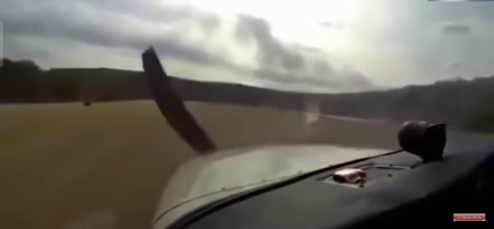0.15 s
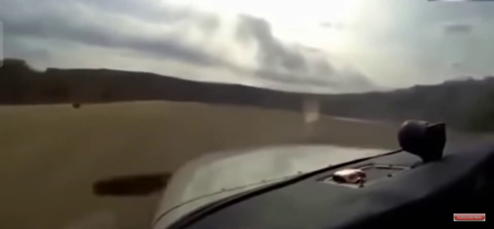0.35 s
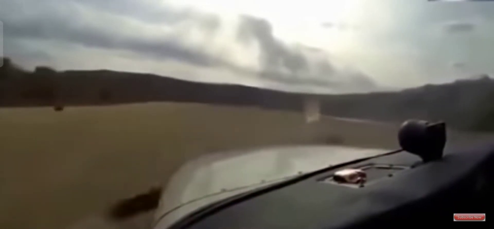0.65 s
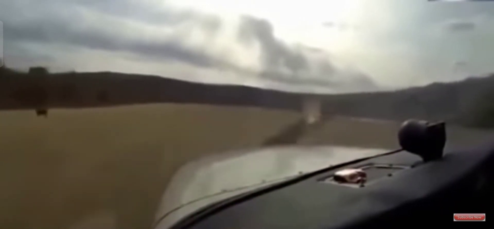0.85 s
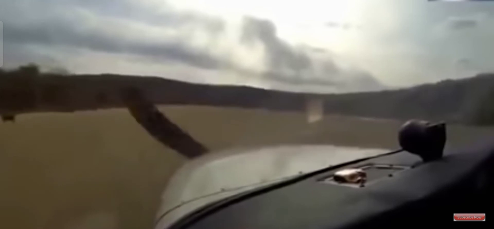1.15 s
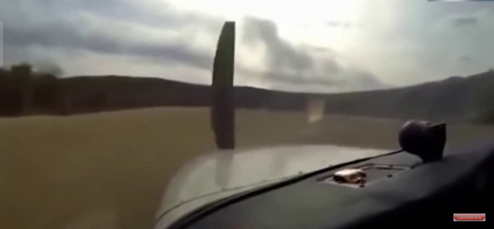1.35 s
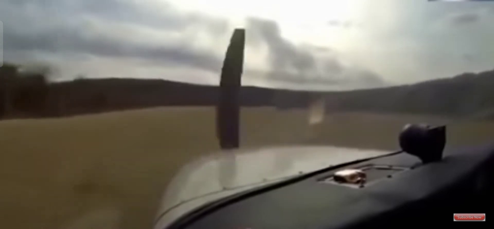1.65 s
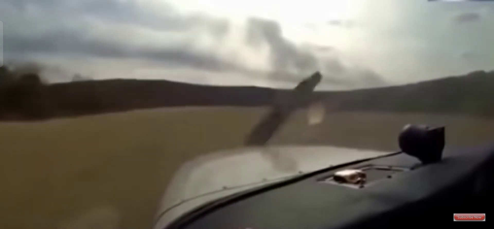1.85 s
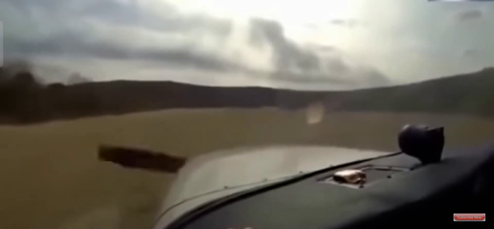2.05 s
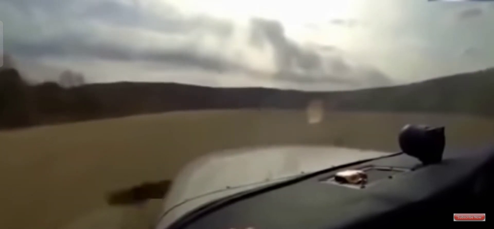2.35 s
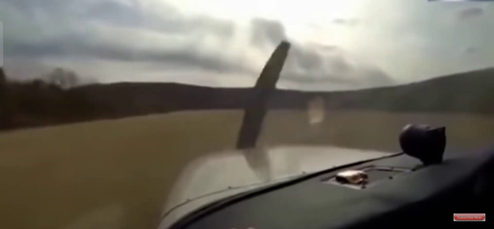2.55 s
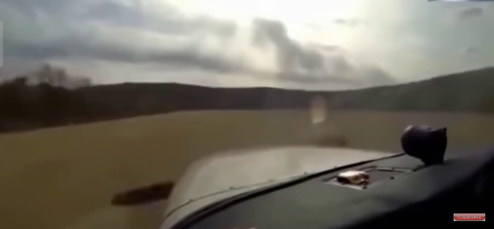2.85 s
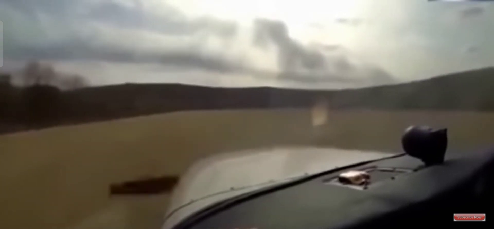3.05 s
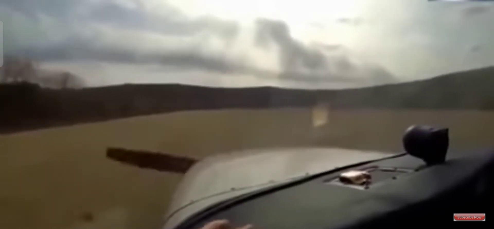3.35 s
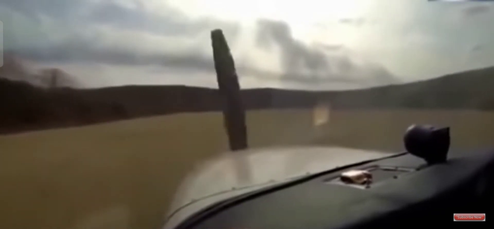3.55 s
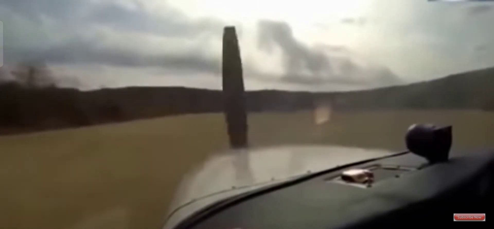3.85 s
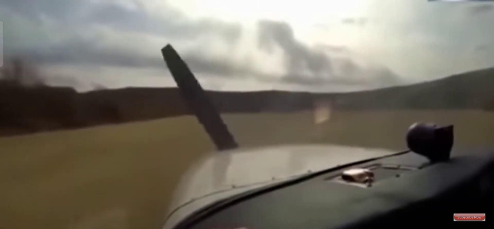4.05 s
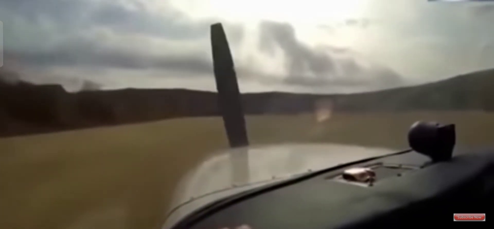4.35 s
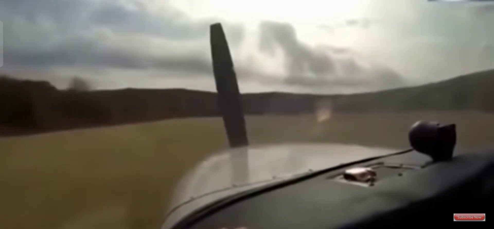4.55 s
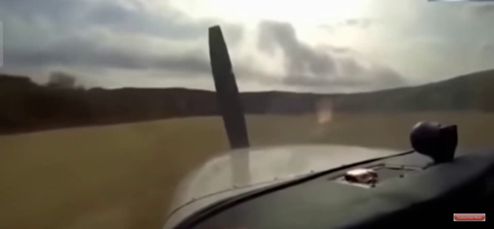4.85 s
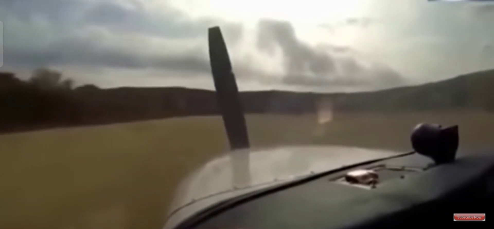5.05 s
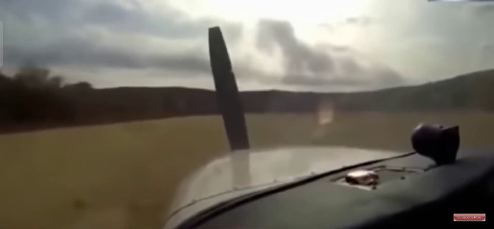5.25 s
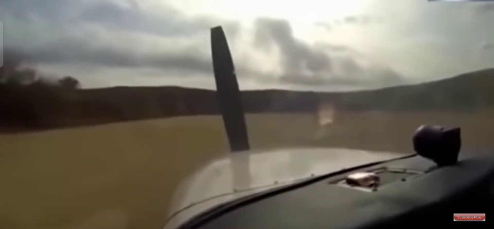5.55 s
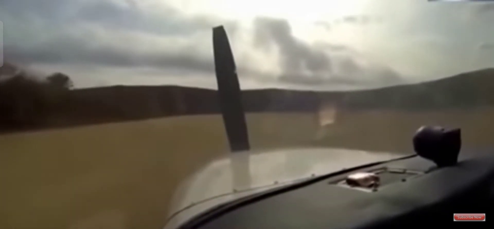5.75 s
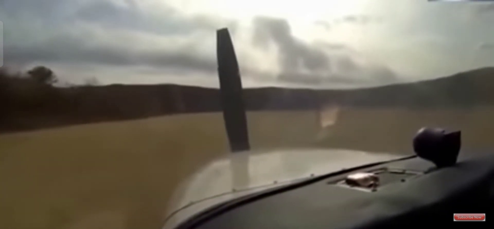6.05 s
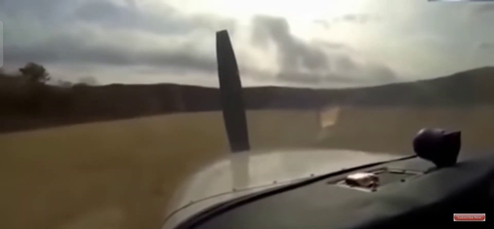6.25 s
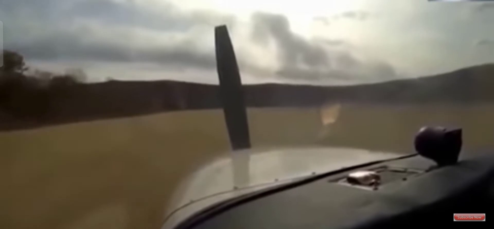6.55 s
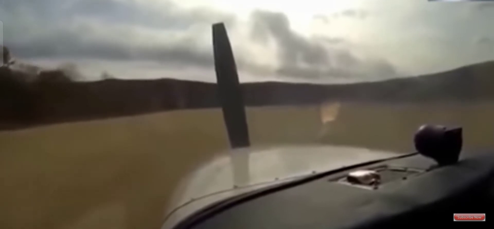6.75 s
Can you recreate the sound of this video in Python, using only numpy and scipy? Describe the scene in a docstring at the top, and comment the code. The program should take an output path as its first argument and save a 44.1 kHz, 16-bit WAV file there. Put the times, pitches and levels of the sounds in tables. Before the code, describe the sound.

Heard from the seat of a small plane gliding down: a heavy low buffeting boom throbs unevenly with a wavering hum, over a much quieter airy hiss. Loose panels tick and chatter, joints creak faintly, dull jolts thump the airframe. Near six seconds the wheels hit with a deep thud and short turf crunch; the hiss drops and bumps clatter. Close, mono, limited and dull on top.

```python
"""In the cabin of a small plane gliding onto a grass field, heard from the seat: close, mono, limited.
Noise rung through low resonances makes the buffeting boom, over a wavering sine hum; noise shaped by the
canopy's hollows makes the slipstream hiss. Short decaying tones tick, creak and thump in panel and airframe.
Near six seconds the wheels hit: the hiss falls away, turf crunches, and bumps thump and clatter."""
import sys
import numpy as np
from scipy.fft import rfft, irfft, next_fast_len
from scipy.io import wavfile
from scipy.ndimage import uniform_filter1d, minimum_filter1d, map_coordinates

SR = 44100
rng = np.random.default_rng(int(sys.argv[2]) if len(sys.argv) > 2 else 0)


def put_to_file(sound):
    """Save the sound as 16-bit audio at rate SR, in the file named by the first command-line argument."""
    columns = np.atleast_2d(sound).T  # one column per channel
    safe = np.clip(columns, -1, 1)
    whole_steps = np.round(safe * 32767)
    wavfile.write(sys.argv[1], SR, whole_steps.astype(np.int16))


N = 304290  # length in samples, about 6.9 s
TIME_S = np.arange(N) / SR
TOP_HZ = 8300  # nothing is kept above this
TOUCHDOWN_S = 5.912  # the wheels meet the grass
SETTLE_S, DULLING_S = 0.011, 0.05  # the shaking builds up, and the treble dies away, over these times


def amp(db):
    """Decibels to gain."""
    return 10 ** (np.asarray(db) / 20)


def unit(x):
    """Scale to rms 1."""
    return x / np.sqrt(np.mean(x ** 2) + 1e-20)


def along(points, hz):
    """Read (pitch_hz, value) points on a log frequency axis."""
    point_hz, values = np.transpose(points)
    return np.interp(np.log(hz + 1), np.log(point_hz + 1), values)


def curve(rows):
    """Draw straight lines through (time_s, value) rows, one value per sample."""
    times, values = np.transpose(rows)
    return np.interp(TIME_S, times, values)


def swings(level_db):
    """A level curve's departures from its own mean."""
    return level_db - level_db.mean()


def wobble(rate):
    """A smooth random curve, rate knots a second."""
    knots = rng.standard_normal(int(N * rate / SR) + 4)
    return map_coordinates(knots, [np.arange(N) * rate / SR])


def filtered(x, response):
    """Multiply the spectrum of x by a response of frequency."""
    size = next_fast_len(len(x) + SR // 2)
    spectrum = rfft(x, size) * response(np.fft.rfftfreq(size, 1 / SR))
    return irfft(spectrum, size)[:len(x)]


def shaped_noise(points, envelope):
    """White noise under an envelope, then coloured by (pitch_hz, relative_db) points."""
    noise = rng.standard_normal(len(envelope)) * envelope
    return filtered(noise, lambda f: amp(along(points, f)))


def body(modes, f):
    """Causal response of (pitch_hz, width_hz, level_db) resonances, with alternating signs."""
    total = 0
    for k, (hz, width, db) in enumerate(modes):
        damping = 1j * f * width
        total = total + (-1) ** k * amp(db) * damping / (hz * hz - f * f + damping)
    return total


def hollows(modes, f):
    """Gain of steep-sided (pitch_hz, width_hz, level_db) resonances whose powers add."""
    return np.sqrt(sum(amp(db) ** 2 / (1 + (2 * (f - hz) / width) ** 2) ** 2 for hz, width, db in modes))


def steady(x, span):
    """Even out the loudness of x over span seconds, at rms 1."""
    size = int(span * SR) + 1
    power = np.abs(uniform_filter1d(x ** 2, size))
    return unit(x / np.sqrt(uniform_filter1d(power, size) + 1e-12))


def boom(modes, edge_hz, span):
    """Turbulence, as noise, ringing in low resonances at an even strength of rms 1."""
    noise = rng.standard_normal(N)
    rung = filtered(noise, lambda f: body(modes, f) / (1 + (f / edge_hz) ** 6))
    return steady(rung, span)


def add(track, s, sound, db):
    """Mix a sound into the track at time s with the given peak level."""
    part = track[round(s * SR):][:len(sound)]
    part += amp(db) * sound[:len(part)] / np.abs(sound).max()


def swell(rise, t60):
    """Envelope of a cushioned blow: a soft rise and a steady decay, cut at a quarter second."""
    t = np.arange(SR // 4) / SR
    return (1 - np.exp(-(t / rise) ** 2)) * amp(-60 * t / t60)


def thump(hz, rise, t60):
    """A short low ring of the airframe: one sine under a cushioned blow."""
    shape = swell(rise, t60)
    return shape * np.sin(2 * np.pi * hz * np.arange(len(shape)) / SR)


def on_ground(over_s):
    """0 in the air, rising to 1 over the given time once the wheels are down."""
    return np.clip((TIME_S - TOUCHDOWN_S) / over_s, 0, 1)


# airflow over the canopy, before gusts: time_s, level_db
AIRFLOW = [(0.02, -49.5), (0.34, -49.5), (0.76, -45.5), (1.51, -46.5), (1.64, -44.5), (2.01, -49.5),
           (2.16, -47.5), (2.96, -43.5), (3.42, -41.5), (4.07, -43.5), (4.51, -40), (4.99, -41),
           (5.83, -41), (6.13, -54), (6.42, -57.5), (6.88, -50)]


def airflow():
    """Level of the passing air in dB, shared by the wash, hiss, rattle and skin drumming."""
    return curve(AIRFLOW)


# steady wash of air over the fuselage, its spectrum: pitch_hz, relative_db
WASH_COLOUR = [(250, -21), (450, -8), (600, -0.5), (800, -6.5), (940, -2.5), (1060, -13.5), (1300, -3),
               (2500, -35.5), (8000, -54.5)]


def wash(shiver, wash_db=-56.0, flow_share=0.11, swell_db=0.9, flutter_db=3.0, shiver_db=2.54):
    """A dull wash between boom and hiss partly follows the airflow and flutters as the skin shivers."""
    air = unit(shaped_noise(WASH_COLOUR, np.ones(N)))
    level_db = wash_db + flow_share * swings(airflow())
    level_db += swell_db * wobble(1.8) + flutter_db * wobble(35) + shiver_db * shiver
    return air * amp(level_db)


# hollow resonances of the canopy: pitch_hz, width_hz, level_db
CANOPY_HOLLOWS = [(954, 40, -14.5), (1459, 227, -1.5), (1658, 130, -4.5), (1920, 270, -7), (2164, 190, -11),
                  (2300, 99, -8), (2640, 540, -20.5), (3074, 140, -18.5), (3448, 120, -11),
                  (3820, 550, -17), (4796, 64, -12), (4900, 460, -17.5), (5505, 350, -18.5),
                  (6550, 330, -27.5), (6820, 270, -25), (7300, 240, -36), (7850, 900, -41.5)]


def slipstream(split_hz=2700, eddy_db=1.29, eddy_rate=50, gust_db=0.5, gust_rate=7):
    """Eddying air sounds the canopy's hollows; stronger flow is brighter, and on the ground it turns dull."""
    treble_db, brightens, ground_treble_db = -10, 0.36, -10  # brightens: extra dB per dB of flow
    swish_s, swish_width_s, swish_db = 6.185, 0.05, -59  # a brief swell of treble hiss after touchdown
    flow_db = airflow() + gust_db * wobble(gust_rate)
    bright_db = treble_db + brightens * swings(flow_db) + ground_treble_db * on_ground(DULLING_S)
    swish = amp(swish_db) * np.exp(-((TIME_S - swish_s) / swish_width_s) ** 2)
    eddies = rng.standard_normal(N) * amp(eddy_db * wobble(eddy_rate))
    hiss = filtered(eddies, lambda f: hollows(CANOPY_HOLLOWS, f))
    low = filtered(hiss, lambda f: 1 / (1 + (f / split_hz) ** 16))
    treble = unit(hiss - low)
    return amp(flow_db) * unit(low) + (amp(flow_db + bright_db) + swish) * treble


# faint short creaks in the cabin, level before creak_db: start_s, level_db, pitch_hz, glide_hz_per_s
CREAK_EVENTS = [(0.945, -34.5, 460, 193), (3.35, -39, 990, -900), (3.425, -40, 697, -300),
                (3.730, -41.5, 768, -1200), (4.345, -36.5, 503, 600)]


def creaks(creak_db=-5.0, rough=0.7, rough_rate=130, flutter_db=3):
    """Flexing joints rub briefly: each sings one rough, sliding note."""
    out, shape = np.zeros(N), swell(rise=0.018, t60=0.27)
    t = np.arange(len(shape)) / SR
    for s, db, hz, glide in CREAK_EVENTS:
        phase = 2 * np.pi * (hz + glide * t / 2) * t + rough * wobble(rough_rate)[:len(t)]
        flutter = amp(flutter_db * wobble(rough_rate)[:len(t)])
        add(out, s, shape * np.sin(phase) * flutter, db + creak_db)
    return out


def touch(contact):
    """Envelope of a soft contact: it swells and dies within some milliseconds."""
    t = np.arange(SR // 20) / SR
    return t ** 4 * np.exp(-t / contact)


# modes of the loose panel, before each tap's random shifts: pitch_hz, level_db
PANEL_MODES = [(930, -17.5), (1300, -11.5), (1470, -1), (1960, -13), (2270, -20)]


def tap(contact, ring_db, ring_hz=1475, ring_t60=0.14, detune=0.018):
    """One soft contact of the panel: its modes shift with each seating, and a ring near the main one lasts."""
    shape = touch(contact)
    t = np.arange(len(shape)) / SR
    turn = 2 * np.pi * t * (1 + detune * rng.standard_normal())
    modes = np.zeros(len(shape))
    for hz, db in PANEL_MODES:
        gain = amp(db + rng.normal(0, 2.7))
        modes += gain * np.sin(hz * (1 + rng.normal(0, 0.022)) * turn)
    strike = shape / shape.max() * modes
    onset = np.cumsum(shape) / shape.sum()
    ring = onset * amp(ring_db - 60 * t / ring_t60) * np.sin(ring_hz * turn)
    return strike + ring


def rattle(per_second=22, flow_share=0.99, spread_db=2.0, contact=0.001, ring_db=-14):
    """Small taps of the panel chatter at random, harder in stronger airflow."""
    out, flow_db = np.zeros(N), airflow()
    force_db = flow_db.mean() + flow_share * swings(flow_db)
    for place, size in rng.random((int(per_second * N / SR), 2)):
        level_db = force_db[int(place * N)] + spread_db * (2 * size - 1)
        add(out, place * (N - 1) / SR, tap(contact, ring_db), level_db)
    return out


# frame behind the panel: pitch_hz, relative_db, t60_s
FRAME_MODES = [(137.3, 0, 0.12), (213.7, 1.5, 0.04), (346, -2.5, 0.031), (474, -14, 0.027)]
# clearest ticks of the panel, before lead, tick_db and knock_db:
# start_s, level_db, knock_relative_db, ring_relative_db
TICK_EVENTS = [(0.2201, -28.5, 5, -24), (0.336, -38.5, 1.5, -20), (0.422, -39.5, 9, -13),
               (0.5828, -29, -8, -9), (0.7706, -37, -6, -8), (1.081, -40.5, -7, -11), (1.2262, -33, -4, -8),
               (1.27, -39, 9, -15), (1.307, -43, 1, -15), (1.364, -32, -5.5, -15), (1.455, -41, -7, -15),
               (1.4733, -34, -0.5, -21), (1.534, -40, -6, -20), (1.583, -36, 5, -19), (1.687, -30, -9, -10),
               (1.715, -44.5, -3, -14), (1.7582, -29, 6, -11), (1.7956, -34, 14.5, -13),
               (1.9064, -34.5, 15, -16), (2.027, -25, 7, -18), (2.064, -37, 13, -13), (2.144, -38, 0, -18),
               (2.251, -41, -4, -12), (2.273, -38.5, 5, -12), (2.398, -34.5, -1, -14),
               (2.710, -41, -5, -13), (2.921, -24.5, 3.5, -17), (2.989, -33, -6, -16),
               (3.168, -36, -4, -9.5), (3.3044, -31.5, 5.5, -13), (3.545, -37, -6, -3),
               (3.692, -33.5, 8, -6), (3.91, -29, -1, 1), (3.949, -34, 4, -9), (4.407, -37, 1, 1),
               (4.835, -35.5, -15, 7), (4.92, -37, -10, -3), (5.745, -36, -6, 7), (5.928, -35, 11, -15),
               (5.94, -40, 13, -15), (5.952, -32, 3, -18), (5.9573, -32.5, 10.5, -15.5),
               (5.979, -40, 6.5, -10), (5.996, -34.5, 12.5, -13), (6.01, -33, 12, -9),
               (6.034, -41.5, 6, -12), (6.0957, -44.5, -1, -15), (6.175, -44, 9, -10),
               (6.188, -44, 11, -11), (6.202, -41.5, 18.5, -11), (6.2567, -53, 11.5, -15),
               (6.3164, -38, 11, -12), (6.342, -45, 4, -11.5), (6.388, -44.5, -6, -13),
               (6.4463, -41.5, 6, -12), (6.4666, -44.5, 1, -17), (6.492, -45.5, -1, -13),
               (6.523, -37, 5, -11), (6.5745, -41.5, 16, -16), (6.615, -41, 9, -5), (6.650, -48, 0.5, -15),
               (6.662, -40.5, 14.5, -14.5), (6.682, -41, -1, -17), (6.696, -42.5, 8, -13),
               (6.7472, -37, 12, 1), (6.7885, -40, 12, -17), (6.798, -42.5, 7, -9), (6.8187, -42, -1, -21),
               (6.834, -41, 7, -21), (6.8629, -36, 10, -2), (6.878, -43, 9, -11)]


def ticks(tick_db=4.5, knock_db=-1.5, contact=0.0011, knock_rise=0.0024, lead=0.001):
    """The loose panel taps its frame, which answers with a short dull knock."""
    out = np.zeros(N)
    knock = sum(amp(db) * thump(hz, knock_rise, t60) for hz, db, t60 in FRAME_MODES)
    for s, db, dull_db, ring_db in TICK_EVENTS:
        add(out, s - lead, tap(contact, ring_db), db + tick_db)
        add(out, s - lead, knock, db + dull_db + knock_db)
    return out


# the drumming skin, its spectrum: pitch_hz, relative_db
SKIN_COLOUR = [(80, -39), (120, -6), (142, 1), (180, 0.5), (215, -7.5), (252, -8.5), (288, -11.5),
               (315, -10), (385, -12.5), (450, -19), (520, -29), (800, -52.5), (1500, -100)]


def shudder(shudder_db=-37, flow_share=0.11, rolling_db=3):
    """Level of the skin's shaking in dB: it follows the airflow and rises on the ground."""
    return shudder_db + flow_share * swings(airflow()) + rolling_db * on_ground(SETTLE_S)


def drumming(shiver, skin_db=-0.8, flutter_db=0.9, shiver_db=2.5):
    """Eddies drum on the skin in uneven throbs."""
    skin = shaped_noise(SKIN_COLOUR, amp(flutter_db * wobble(45)))
    return amp(shudder() + skin_db + shiver_db * shiver) * steady(skin, span=0.046)


# dull jolts in flight, level before the offsets below: start_s, level_db, pitch_hz
JOLT_EVENTS = [(0.05, -18, 188), (0.163, -25, 184), (0.245, -17, 148), (0.333, -21, 192), (0.421, -23, 196),
               (0.756, -34.5, 125), (0.969, -31, 171), (1.046, -34, 160), (1.206, -20.5, 194),
               (1.26, -24, 145), (1.795, -21, 184), (1.835, -18.5, 140), (2.023, -15, 134),
               (2.06, -20, 177), (2.306, -26, 197), (2.404, -20.5, 159), (2.549, -19, 129),
               (2.917, -22, 185), (3.70, -25, 125), (3.741, -22.5, 135), (4.307, -25, 130),
               (4.386, -23, 140), (4.808, -26, 178), (5.084, -32, 148)]


def jolts(jolt_db=-1, cabin_hz=86, cabin_db=-2, drum_db=-8):
    """Dull thumps run through the airframe on the way down; each makes the cabin boom and the skin drum."""
    out, shape = np.zeros(N), swell(rise=0.003, t60=0.14)
    for s, db, hz in JOLT_EVENTS:
        add(out, s, thump(hz, rise=0.004, t60=0.08), db + jolt_db)
        add(out, s, thump(cabin_hz, rise=0.047, t60=0.53), db + cabin_db)
        drum = shape * shaped_noise(SKIN_COLOUR, np.ones(len(shape)))
        add(out, s, drum, db + drum_db)
    return out


# deep boom of the fuselage, before heaving: time_s, level_db
DEEP_LEVEL = [(0.3, -14), (0.42, -32), (0.56, -23.5), (0.66, -24), (0.8, -19.5), (0.92, -22), (1.1, -19.5),
              (1.28, -16.5), (1.7, -18), (2.15, -28), (2.42, -14), (2.7, -32), (2.85, -17), (3.35, -23.5),
              (3.55, -16.5), (3.85, -24), (4.08, -42), (4.25, -19.5), (4.47, -37), (4.6, -17), (5.0, -28),
              (5.15, -22.5), (5.42, -17.5), (5.6, -29), (5.98, -12.5), (6.15, -28.5), (6.35, -18),
              (6.6, -25), (6.9, -21)]


def fuselage(heave_db=1.0, heave_rate=14, sway_db=-25.5):
    """The whole fuselage booms and heaves below the cabin's pitch, over a sway at the edge of hearing."""
    deep_modes, sway_modes = [(49.15, 6, 0)], [(24, 4, 0)]  # pitch_hz, width_hz, level_db
    deep_level = amp(curve(DEEP_LEVEL) + heave_db * wobble(heave_rate))
    deep = deep_level * boom(deep_modes, edge_hz=75, span=0.085)
    sway = amp(sway_db) * boom(sway_modes, edge_hz=40, span=0.28)
    return deep + sway


# strength of the buffeting, before boom_db, drone_db and throb: time_s, level_db
BUFFET_LEVEL = [(0.1, -19), (0.48, -20), (0.56, -19.5), (0.88, -15.5), (0.98, -27), (1.18, -16.5),
                (1.36, -19.5), (1.59, -16.5), (1.76, -25), (1.82, -14), (1.9, -17), (2.0, -20.5),
                (2.09, -11.5), (2.15, -25), (2.3, -20), (2.58, -16.5), (2.7, -31.5), (2.87, -20),
                (3.03, -16.5), (3.13, -24), (3.28, -22.5), (3.45, -12), (3.57, -25.5), (3.63, -15),
                (3.76, -18), (3.83, -14.5), (3.96, -26.5), (4.17, -24.5), (4.28, -16.5), (4.6, -20.5),
                (5.2, -19), (5.42, -17), (5.6, -23), (5.9, -22), (6.05, -15), (6.23, -19), (6.3, -21.5),
                (6.7, -16.5), (6.9, -22.5)]
# main boom of the cabin: pitch_hz, width_hz, level_db
CABIN_MODES = [(71.5, 11, 1), (88.3, 11.1, -0.5), (116.6, 8.2, -5)]
# centre pitch of the wavering hum: time_s, pitch_hz
HUM_PITCH = [(0.1, 90), (0.38, 95), (0.52, 87), (1.25, 87), (1.55, 79), (1.85, 89), (2.08, 92), (2.28, 82),
             (3.05, 91), (3.45, 86), (4.3, 88), (5.15, 86), (5.5, 90), (5.8, 84), (6.08, 88), (6.28, 81),
             (6.75, 90)]


def buffet(boom_db=-2.6, edge_hz=135, drone_db=-3.0, drone_grows=1.15,
           wander_hz=2.02, wander_rate=10, throb_db=1.5, throb_rate=22):
    """Turbulence pumps the cabin in a quick throb; harder pushes gather the boom into one wavering hum."""
    push_db = curve(BUFFET_LEVEL)
    rumble = amp(push_db + boom_db) * boom(CABIN_MODES, edge_hz, span=0.05)
    pitch_hz = curve(HUM_PITCH) + wander_hz * wobble(wander_rate)
    tone = unit(np.sin(2 * np.pi * np.cumsum(pitch_hz) / SR))
    # above 1, drone_grows makes the hum swell faster than the rumble
    drone = amp(push_db.mean() + drone_grows * swings(push_db) + drone_db) * tone
    return (rumble + drone) * amp(throb_db * wobble(throb_rate))


# small hardware, its modes: pitch_hz, width_hz, level_db
HARDWARE_MODES = [(2100, 280, -11), (2780, 550, -5.5), (3520, 200, -2.5)]
# sharp clicks on the ground: start_s, level_db
CLICK_EVENTS = [(6.010, -48.5), (6.216, -43), (6.545, -57), (6.586, -46.5)]


def clicks(t60=0.026):
    """Small metal parts snap against each other: short noise bursts ring in the hardware's modes."""
    out, shape = np.zeros(N), swell(rise=0.00044, t60=t60)
    for s, db in CLICK_EVENTS:
        burst = shape * rng.standard_normal(len(shape))
        add(out, s, filtered(burst, lambda f: body(HARDWARE_MODES, f) * (f < TOP_HZ)), db)
    return out


# crunch of the tyres in the turf, its spectrum: pitch_hz, relative_db
TURF_COLOUR = [(200, -6.5), (400, 10), (650, -8.5), (950, 0.5), (1350, -7), (1700, -11.5), (2600, -16),
               (3600, -17), (5000, -42.5)]


def touchdown(turf_db=-38, fade_db_per_s=95, grain_db=3.5):
    """The tyres tear through the turf in one short crunch that fades steadily."""
    crunch = unit(shaped_noise(TURF_COLOUR, amp(grain_db * wobble(140))))
    since = np.maximum(TIME_S - TOUCHDOWN_S - SETTLE_S, 0)
    return crunch * on_ground(SETTLE_S) * amp(turf_db - fade_db_per_s * since)


# clatter of the shaken fittings, its spectrum: pitch_hz, relative_db
FITTINGS_COLOUR = [(100, 0), (330, -4.5), (550, -13), (1000, -16.5), (1450, -11), (2100, -25.5),
                   (2800, -27.5), (3450, -17), (4200, -55.5)]
# bumps of the wheels on the grass: start_s, level_db, pitch_hz, clatter_relative_db
BUMP_EVENTS = [(5.929, -7, 129, -19), (5.962, -17, 125, -17), (6.001, -32, 157, -16),
               (6.042, -20, 165, -18.5), (6.179, -14.5, 187, -22), (6.211, -5.5, 94, -25.5),
               (6.537, -21, 153, -14.5), (6.584, -20, 154, -15), (6.662, -24.5, 136, -23.5),
               (6.693, -23, 204, -24), (6.787, -20.5, 186, -17), (6.874, -13, 156, -20)]


def wheels(grain_db=5, cabin_hz=84, cabin_db=-4):
    """Each bump of the wheels thumps the airframe, booms in the cabin and sets the fittings clattering."""
    out, shape = np.zeros(N), swell(rise=0.0042, t60=0.25)
    for s, db, hz, clatter_db in BUMP_EVENTS:
        add(out, s, thump(hz, rise=0.0051, t60=0.075), db)
        add(out, s, thump(cabin_hz, rise=0.048, t60=0.34), db + cabin_db)
        unevenness = unit(uniform_filter1d(rng.standard_normal(len(shape)), size=150))
        clatter = shaped_noise(FITTINGS_COLOUR, amp(grain_db * unevenness) * shape)
        add(out, s, clatter, db + clatter_db)
    return out


def scene(shiver_rate=32):
    """Everything as heard from the seat; one shiver of the skin shakes both the drumming and the wash."""
    shiver = wobble(shiver_rate)
    air = wash(shiver) + slipstream() + drumming(shiver) + fuselage() + buffet()
    airframe = creaks() + rattle() + ticks() + jolts()
    ground = clicks() + touchdown() + wheels()
    return (air + airframe + ground)[None]


def limited(x, ceiling_db=-3.4, hold_s=0.015):
    """The gain ducks smoothly around any peak above the ceiling."""
    hold = int(hold_s * SR) + 1
    needed = np.minimum(1, amp(ceiling_db) / (np.abs(x) + 1e-9))
    return x * uniform_filter1d(minimum_filter1d(needed, hold), hold)


def record(dry):
    """The microphone's limiter ducks the loudest peaks, then nothing is kept above the band limit."""
    return np.array([filtered(limited(channel), lambda f: f < TOP_HZ) for channel in dry])


dry = scene()
out = record(dry)
put_to_file(out)
```